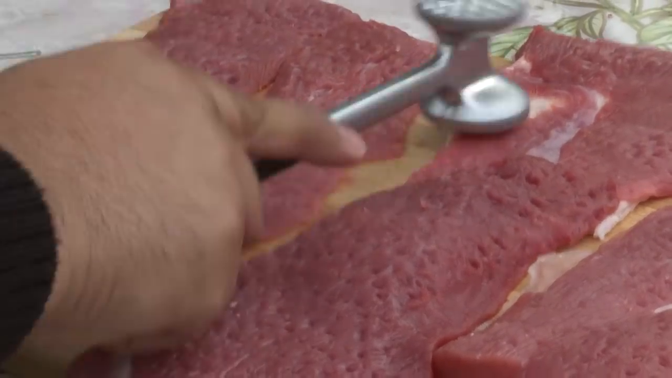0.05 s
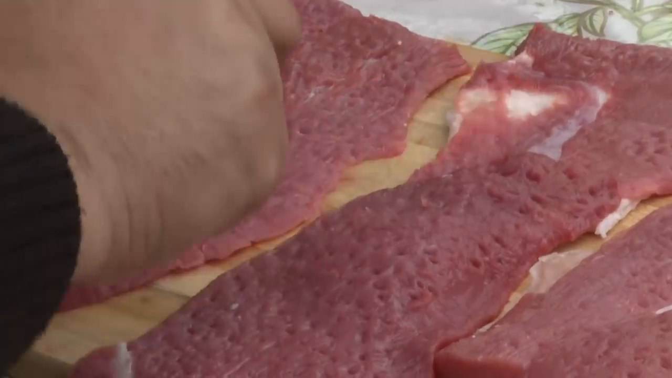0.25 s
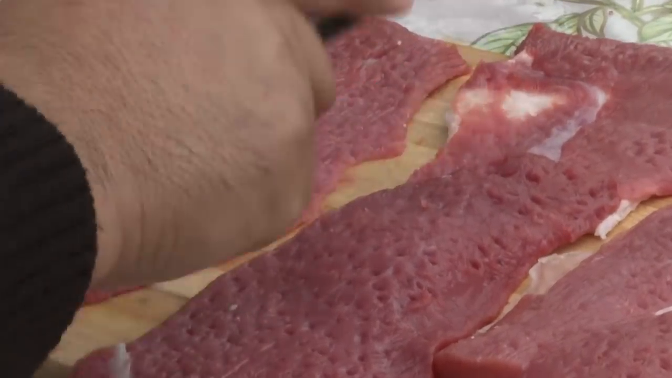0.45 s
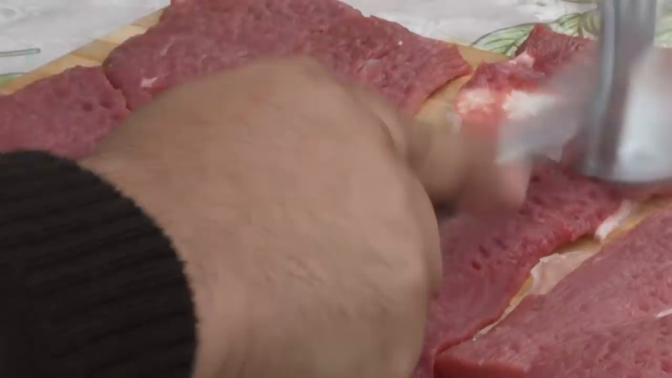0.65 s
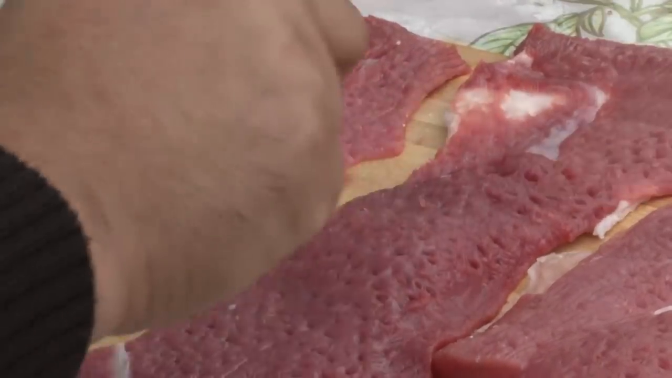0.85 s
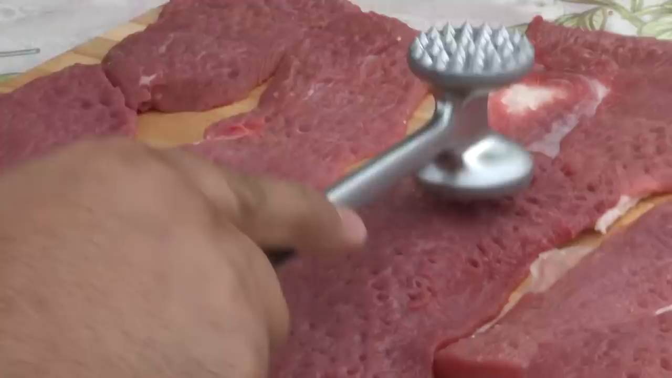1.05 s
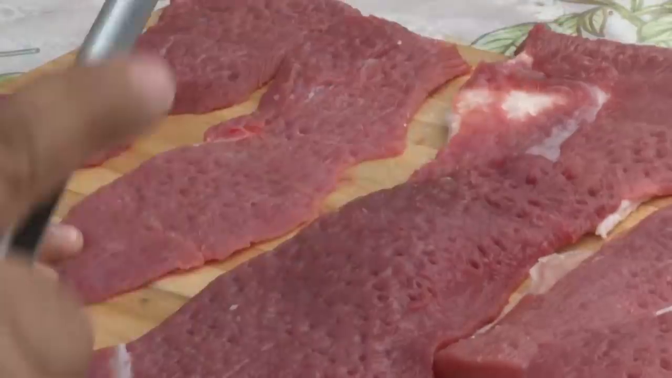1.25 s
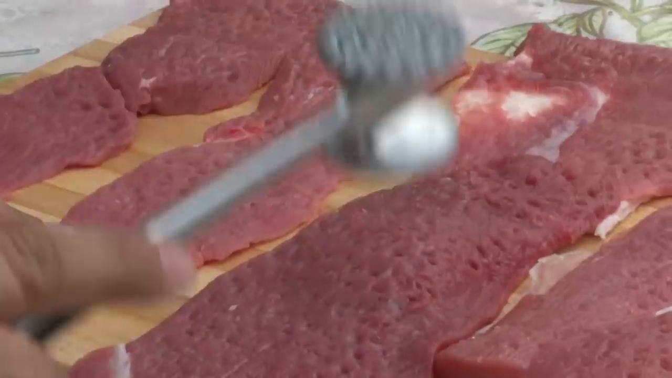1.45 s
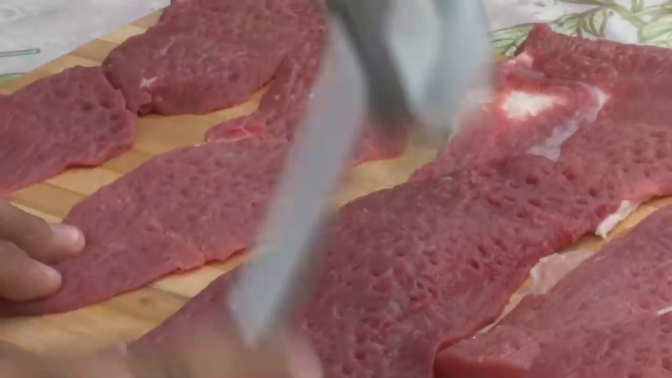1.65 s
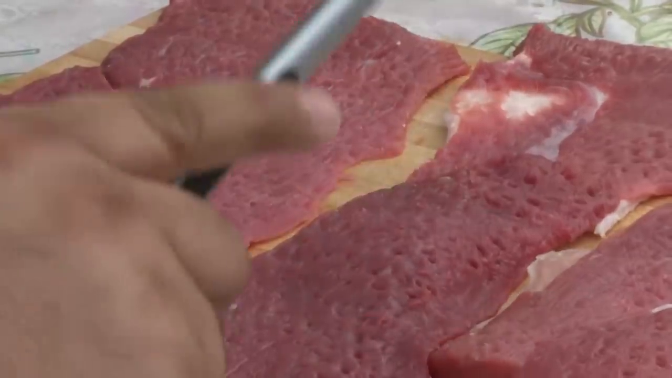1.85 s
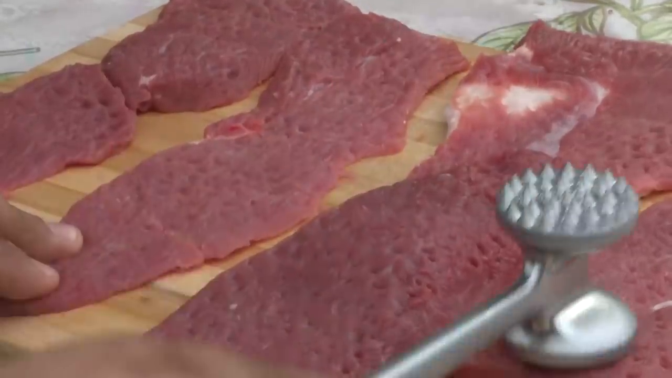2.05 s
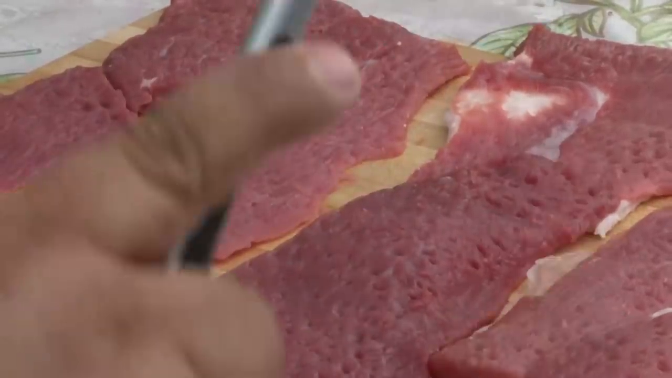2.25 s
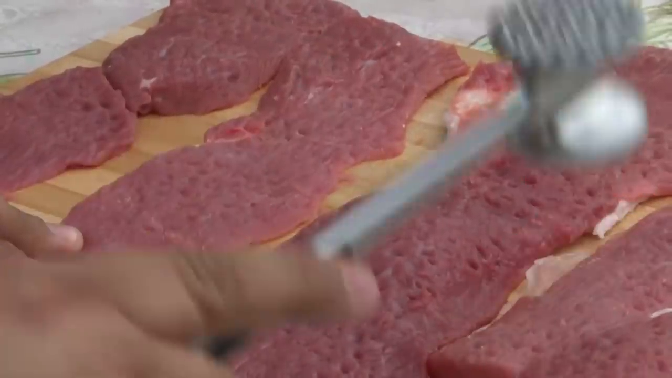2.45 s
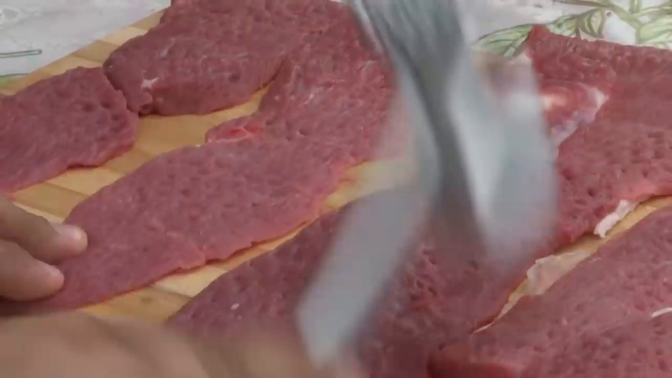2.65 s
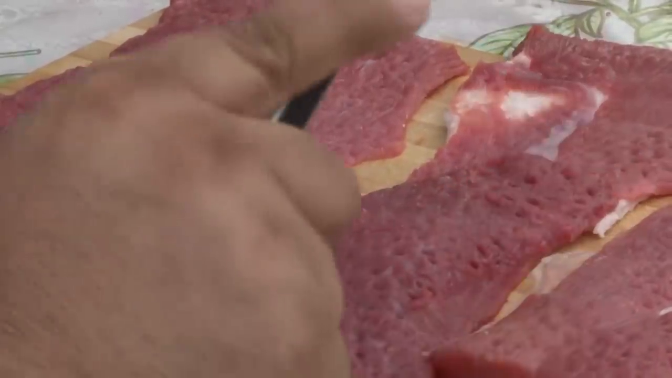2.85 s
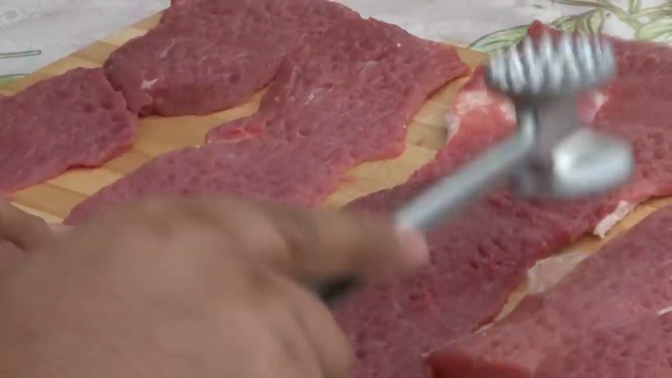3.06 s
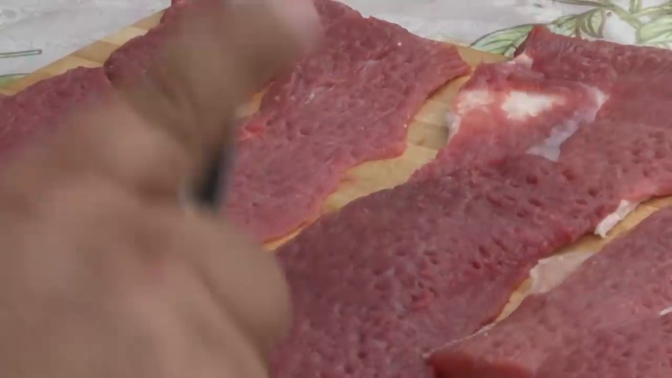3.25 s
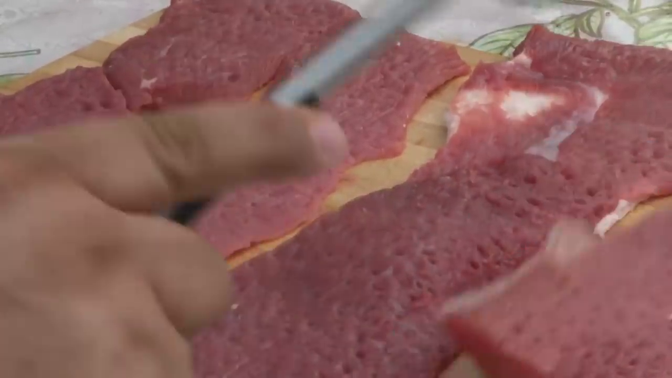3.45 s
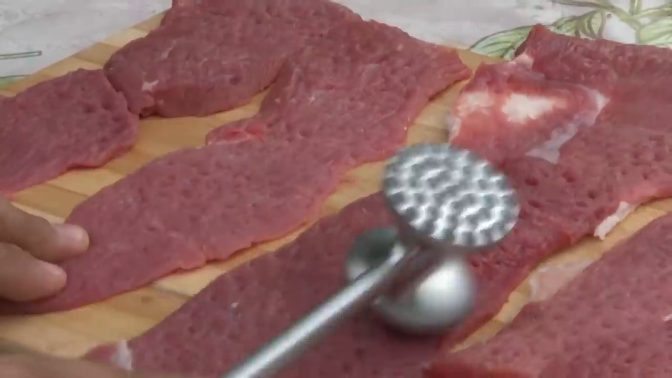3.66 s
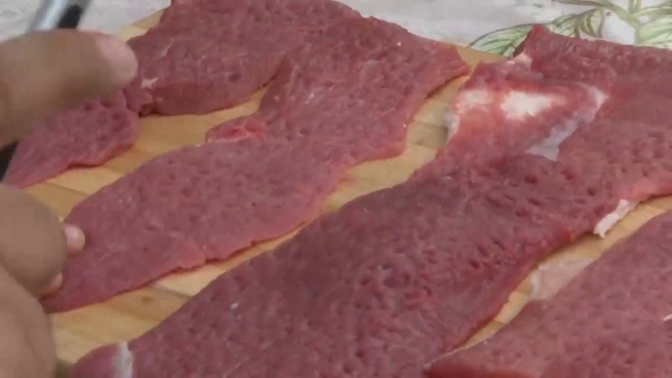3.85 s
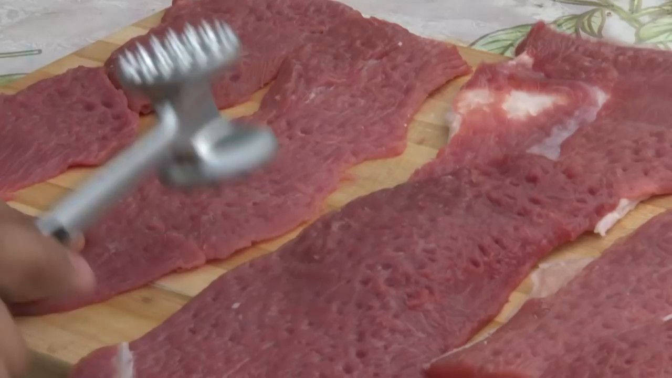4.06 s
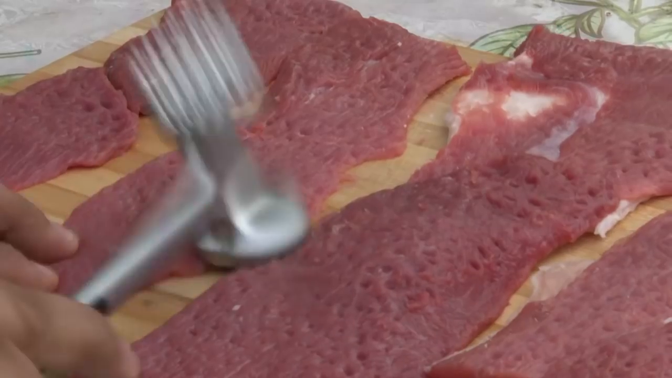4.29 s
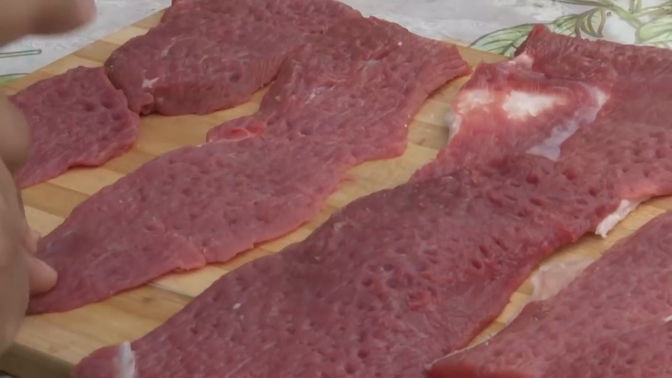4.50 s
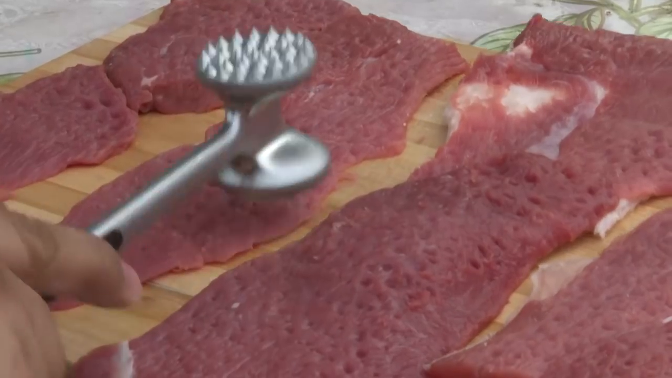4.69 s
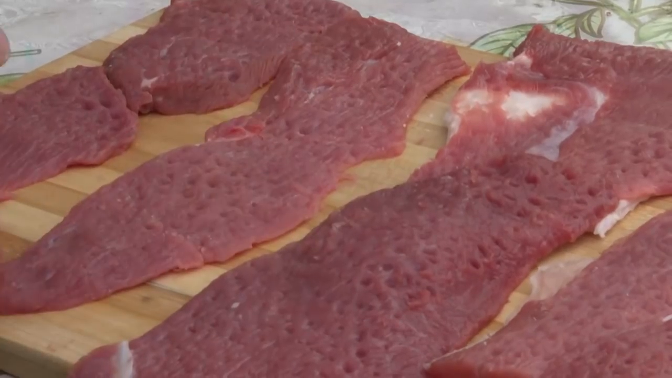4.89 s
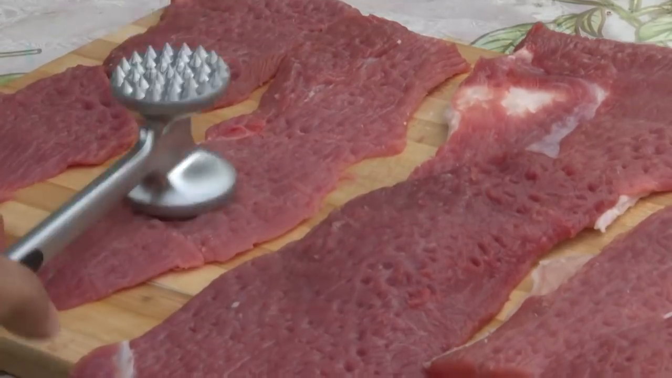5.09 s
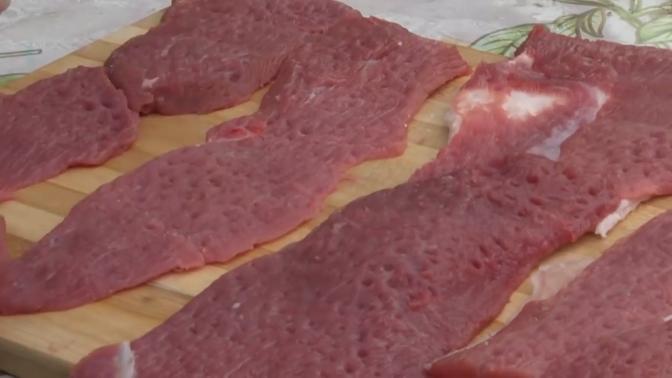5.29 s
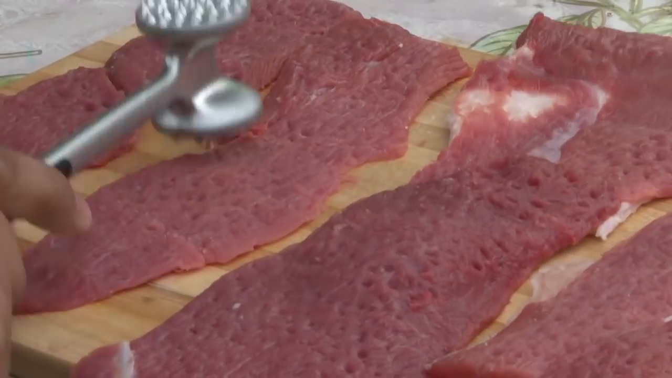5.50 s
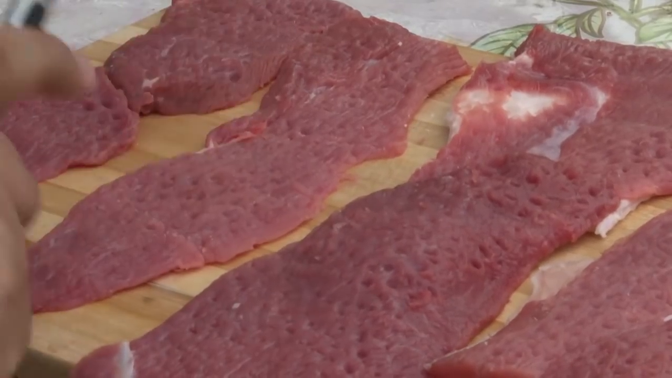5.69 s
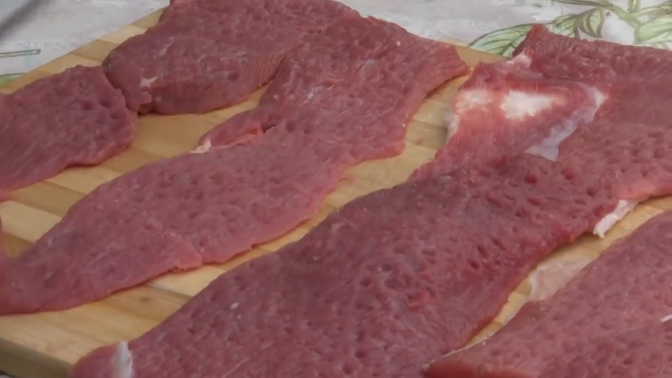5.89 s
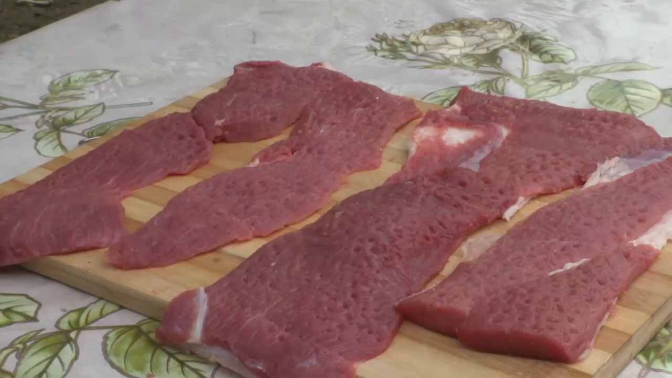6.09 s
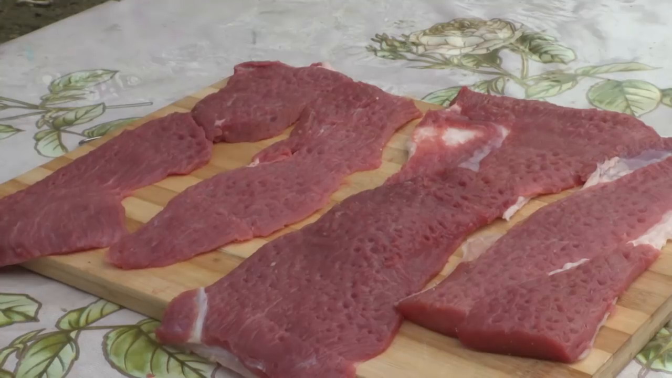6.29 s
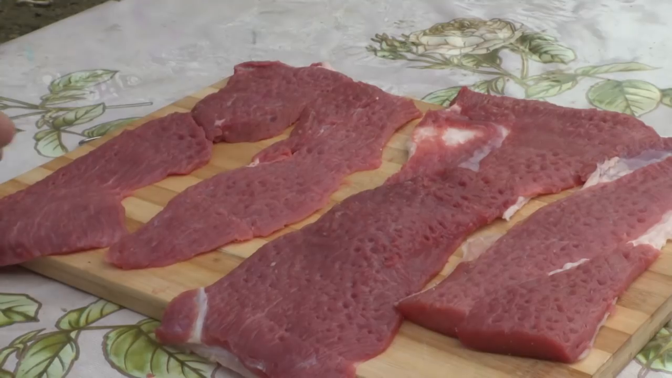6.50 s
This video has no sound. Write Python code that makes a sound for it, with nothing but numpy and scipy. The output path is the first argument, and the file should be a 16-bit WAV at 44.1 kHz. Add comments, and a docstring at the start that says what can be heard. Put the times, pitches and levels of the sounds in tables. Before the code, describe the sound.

Quick, even mallet blows smack moist meat slices on a hollow-sounding wooden board, with board rattle, sticky peeling and a quiet finish.

```python
"""A metal mallet pounds thin slices of meat on a wooden board, three blows a second, close to the microphone.
Each blow is a wet slap of filtered noise and a thump of damped board and table modes;
where the meat is thin the teeth crack on the wood. The board hops and drops back with a noisy knock,
the mallet peels off the meat in grainy crackle, and the hardest blows overload the microphone.
Room echoes, soft scuffs, faint chirps, rumble, air noise and hiss of changing level lie around and beneath."""
import sys
import numpy as np
from scipy import signal
from scipy.fft import rfft, irfft
from scipy.io import wavfile
from scipy.ndimage import uniform_filter1d

SR = 44100
rng = np.random.default_rng(int(sys.argv[2]) if len(sys.argv) > 2 else 0)


def transcribe(signal):
    """Save signal, clipped to [-1, 1], as a 16-bit WAV file at the path in sys.argv[1]."""
    frames = np.atleast_2d(signal).T
    limited = np.clip(frames, -1, 1)
    pcm = np.round(limited * 32767).astype(np.int16)
    wavfile.write(sys.argv[1], SR, pcm)


N = 288405

# The mallet blows. Each row: start in seconds, relative force in dB, meat under the mallet in mm,
# relative slap level in dB, slap centre in Hz, clatter level in dB, time the board stays in the air in seconds.
BLOW_LIST = [(0.123, 5, 0.92, -18.5, 6600, -6.5, 0.043), (0.437, 3.5, 1.52, -18, 6220, -6.5, 0.05),
             (0.742, 1.5, 1.11, -14.5, 9600, -9, 0.049), (1.0918, 5, 2.53, -25, 13100, -11.5, .049),
             (1.4255, 9.5, 4.3, -18, 8240, -17, 0.058), (1.770, 8, 5.5, -27, 9370, -10.5, 0.059),
             (2.0995, 8.5, 2.4, -15.5, 11560, -8, 0.063), (2.4343, 8.5, 1.34, -13.5, 8700, -7.5, 0.068),
             (2.7577, 7.5, 2.13, -12.5, 8000, -8, 0.063), (3.0641, 7.5, 2.3, -19, 7400, -13, .054),
             (3.4016, 8, 2.13, -20.5, 11060, -8.5, 0.061), (3.7236, 6, 5.6, -20, 10200, -20, 0.049),
             (4.0504, 6.5, 6.4, -19, 8800, -18, .046), (4.382, 4.5, 4.9, -32, 6500, -11, 0.037),
             (4.7215, 4, 4.54, -17.5, 8520, -15, 0.047), (5.141, 0.5, 5.9, -18, 7500, -20.5, 0.056),
             (5.506, 4, 5.07, -30.5, 7150, -18.5, 0.045), (5.8331, 3.5, 3.07, -21, 8000, -9, .041)]
# How well the struck spot drives the table, least over the middle of the board.
# Each row: time in seconds, drive in dB.
TABLE_DRIVE = [(0, -30), (.8, -24), (1.8, -43.5), (4, -43), (4.7, -17), (5.85, -17)]
# Colour of sticky or rubbing contact. Each row: frequency in Hz, relative level in dB.
STICKY_SPECTRUM = [(300, -24), (2000, -0.5), (3500, 5.5), (6000, -1), (9000, -6), (11000, -12),
                   (15500, -19.5)]


def amp(db):
    """Turns decibels into a linear gain."""
    return 10 ** (np.asarray(db) / 20)


def unit(x):
    """Scales a sound to energy one."""
    return x / np.sqrt(np.sum(x ** 2) + 1e-20)


def burst_level(x, db):
    """Gives a short sound the energy of two milliseconds at this RMS level."""
    return amp(db) * unit(x) * np.sqrt(.002 * SR)


def read(table, hz, column=1):
    """Reads a table on a log-frequency axis."""
    table = np.array(table, float)
    return np.interp(np.log(hz + 1), np.log(table[:, 0] + 1), table[:, column])


def add(mix, s, sound):
    """Mixes a sound in at s seconds, cut off at the end of the mix."""
    part = mix[max(round(s * SR), 0):][:len(sound)]
    part += sound[:len(part)]


def colour(x, spectrum, size=4096):
    """Causal minimum-phase filter with the given spectrum."""
    log_gain = np.log(amp(read(spectrum, abs(np.fft.fftfreq(size, 1 / SR)))))
    taps = np.fft.ifft(np.exp(np.conj(signal.hilbert(log_gain)))).real
    return signal.fftconvolve(x, taps[:size // 2])[:len(x)]


def ring(modes, t, pitch=1, tilt_db=0, pivot_hz=150):
    """Damped modes set moving together; tilt_db per octave brightens or dulls them around the pivot."""
    out = 0
    for hz, db, t60 in modes:
        level = amp(db + tilt_db * np.log2(hz / pivot_hz))
        decay = np.exp(-np.log(1000) * t / t60)
        out = out + level * decay * np.cos(2 * np.pi * hz * pitch * t)
    return out


def push(rise):
    """Force of a cushioned contact: it grows as the cushion stiffens, then lets go."""
    u = np.arange(0, 2 * rise, 1 / SR) / rise
    return np.minimum(u, 2 - u) ** 2 / (rise * SR)


def slap(t, delay, db, centre_hz, width=0.00091, touch_db=-10,
         peak_db=7, peak_octaves=0.45, squelch_db=-21, squelch_s=.009):
    """A first touch, then air and juice squirt through the gaps between the teeth; a short squelch follows."""
    # Wet slap colour before the peak. Each row: frequency in Hz, relative level in dB.
    slap_spectrum = [(300, -4), (1500, -5.5), (2700, -11.5), (4500, -3.5), (5900, 5.5), (7300, -3.5),
                     (8800, 1.5), (10800, -7.5), (12500, -1.5), (15000, -0.5), (16500, -12)]
    squirt = np.exp(-.5 * ((t - delay) / width) ** 2)
    touch = amp(touch_db) * (t < delay)
    squelch = amp(squelch_db) * np.exp(-t / squelch_s)
    peaked = []
    for hz, level in slap_spectrum:
        octaves = np.log2(hz / centre_hz)
        peaked.append((hz, level + peak_db * np.exp(-(octaves / peak_octaves) ** 2)))
    noise = rng.standard_normal(len(t))
    return burst_level(colour((squirt + touch + squelch) * noise, peaked), db)


def crack(t, db, scatter_s=0.0014, grit=0.22):
    """One tooth meets the wood and the others follow in a tight scatter."""
    # Bright wood crack. Each row: frequency in Hz, relative level in dB.
    crack_spectrum = [(250, -10.5), (450, 4), (570, 17), (780, 1), (980, 6.5), (1400, -2), (1680, 7),
                      (2250, -9.5), (3000, -2), (3800, 5), (5000, -3.5), (5800, -4), (8000, -14.5),
                      (15000, -25.5)]
    teeth = grit * rng.standard_normal(len(t)) * np.exp(-t / scatter_s)
    teeth[0] += 1
    return burst_level(colour(teeth, crack_spectrum), db)


def clatter(t, db, rise_s=0.003, fall_s=0.009):
    """The pressed board chatters against the table."""
    # Hollow wooden chatter. Each row: frequency in Hz, relative level in dB.
    clatter_spectrum = [(120, -11.5), (240, 0), (370, 2), (470, 1.5), (565, 3.5), (700, -5), (950, -6.5),
                        (1350, -18), (1700, -17.5), (2200, -28), (6000, -27.5), (15000, -43)]
    shape = (1 - np.exp(-t / rise_s)) * np.exp(-t / fall_s)
    return burst_level(colour(shape * rng.standard_normal(len(t)), clatter_spectrum), db)


def smacks(slap_db=3.5, slap_delay=0.0011, clatter_delay=.003):
    """Slap, crack and clatter of every blow; thicker meat makes the teeth crack later and more softly."""
    wood_s, wood_s_per_mm = .0032, .0005
    crack_db, crack_db_per_mm = 2, -6
    t, out = np.arange(SR // 8) / SR, np.zeros(N)
    for s, _, meat_mm, wet_db, centre_hz, clatter_db, _ in BLOW_LIST:
        add(out, s, slap(t, slap_delay, wet_db + slap_db, centre_hz))
        wood_time = s + wood_s + wood_s_per_mm * meat_mm
        add(out, wood_time, crack(t, crack_db + crack_db_per_mm * meat_mm))
        add(out, s + clatter_delay, clatter(t, clatter_db))
    return out


def thumps(thump_db=-1.0, seat_s=.0082, seat_db=-10, hop_s=0.055, hop_db=-9, hop_rise=.007,
           detune=0.046, even_db=-35, dulling=.14):
    """Blows ring board and mallet, duller where the table gives way; the board seats, hops and sinks back."""
    # Board and table under the meat. Each row: frequency in Hz, relative level in dB, T60 in seconds.
    board_modes = [(41, -29.5, 0.27), (76, -30.5, 0.36), (107.8, -9, 0.061), (143.7, -5, .06),
                   (209.9, -8, 0.061), (246, -9.5, 0.087), (294.7, -2, .05), (347.4, 0, 0.052),
                   (389, -16, 0.1), (460, -13.5, 0.086), (525, -19.5, 0.022), (686, -12.5, 0.067)]
    # The mallet's faint metal ring. Each row: frequency in Hz, relative level in dB, T60 in seconds.
    metal_modes = [(1750, -55, .3)]
    # Thicker meat cushions the blow, so the force peaks later.
    rise_s, rise_s_per_mm = 0.0019, .00012
    t, out = np.arange(SR // 2) / SR, np.zeros(N)
    sink = signal.fftconvolve(ring(board_modes, t), push(hop_rise))
    for s, force_db, meat_mm, *_ in BLOW_LIST:
        pitch = 1 + detune * rng.uniform(-1, 1)
        drive_db = np.interp(s, *np.transpose(TABLE_DRIVE))
        tilt_db = dulling * (even_db - drive_db)
        force = amp(force_db + thump_db) * push(rise_s + rise_s_per_mm * meat_mm)
        thump = signal.fftconvolve(ring(board_modes, t, pitch, tilt_db), force)
        add(out, s, thump)
        add(out, s + seat_s / pitch, amp(seat_db) * thump)
        add(out, s + hop_s, -amp(force_db + hop_db) * sink)
        add(out, s, amp(force_db) * ring(metal_modes, t))
    return out


def sway(rise=0.0065):
    """Blows on the less supported parts of the table make it boom."""
    # The table top's slow modes. Each row: frequency in Hz, relative level in dB, T60 in seconds.
    table_modes = [(36, -3, 0.42), (54, 1.5, 0.21), (69, 4, 0.091)]
    t, out = np.arange(SR // 2) / SR, np.zeros(N)
    boom = -signal.fftconvolve(ring(table_modes, t), push(rise))
    for s, *_ in BLOW_LIST:
        add(out, s, amp(np.interp(s, *np.transpose(TABLE_DRIVE))) * boom)
    return out


def drops(settle_s=.002):
    """After each hop the board lands again with a dull knock, louder after a longer hop."""
    # Dull landing knock. Each row: frequency in Hz, relative level in dB.
    knock_spectrum = [(100, -3.5), (300, 4.5), (600, -1), (1000, -5), (1500, -16.5), (2500, -29.5),
                      (6000, -37), (15000, -52)]
    usual_hop_s, knock_db, knock_db_per_doubling = 0.055, -23.5, 23.5
    t, out = np.arange(SR // 10) / SR, np.zeros(N)
    for s, *_, hop in BLOW_LIST:
        landing = t * np.exp(-t / settle_s) * rng.standard_normal(len(t))
        db = knock_db + knock_db_per_doubling * np.log2(hop / usual_hop_s)
        # The swell peaks settle_s after its start, so it starts that much early.
        add(out, s + hop - settle_s, burst_level(colour(landing, knock_spectrum), db))
    return out


def peels(lead=0.063, snap_s=.001, creep_s=0.014, creep_db=-13, grain_db=5):
    """Sticky crackle that gathers into a small snap as the meat lets go of mallet or board."""
    # Between blows the wet meat comes unstuck from the board. Each row: time in seconds, level in dB.
    unstick_list = [(3.555, -46.5), (3.568, -49), (4.891, -58.5), (5.745, -48.5)]
    # The mallet lifts off at nearly the same moment after every blow; smaller snaps fall around it.
    lift_s, lift_spread_s, lift_db = .081, 0.0034, -45.5
    small_s, small_spread_s, small_db = .068, 0.014, -49
    t, out = np.arange(SR // 10) / SR - lead, np.zeros(N)
    shape = np.exp(-abs(t) / snap_s) + amp(creep_db) * np.exp(-abs(t) / creep_s)
    releases = list(unstick_list)
    for s, *_ in BLOW_LIST:
        lift, small = rng.standard_normal(2)
        releases.append((s + lift_s + lift_spread_s * lift, lift_db))
        releases.append((s + small_s + small_spread_s * small, small_db))
    for s, db in releases:
        noise, grain = rng.standard_normal((2, len(t)))
        crackle = noise * amp(grain_db * grain) * shape
        add(out, s - lead, burst_level(colour(crackle, STICKY_SPECTRUM), db))
    return out


def scuffs(grain_db=5):
    """Soft scuffs of hand and sleeve: short swells of grainy friction."""
    # Each row: centre in seconds, half length in seconds, level in dB.
    scuff_list = [(5.773, 0.025, -64), (6.268, 0.029, -65.5), (6.419, .04, -66.5)]
    clock = np.arange(N) / SR
    noise, grain = rng.standard_normal((2, N))
    swell = sum(amp(db) * np.exp(-((clock - s) / half) ** 2) for s, half, db in scuff_list)
    friction = colour(noise * amp(grain_db * grain), STICKY_SPECTRUM)
    return swell * unit(friction) * np.sqrt(N)


def tail(table, delay):
    """Diffuse echoes that die band by band: random signs shaped in short-time spectra."""
    hz, t, z = signal.stft(rng.choice([-1., 1.], SR), SR, nperseg=1024)
    rate = np.log(1000) / read(table, hz, column=2)[:, None]
    # The root keeps each band's energy independent of its decay time.
    z *= amp(read(table, hz))[:, None] * np.exp(-rate * t) * np.sqrt(2 * rate / SR)
    out = np.zeros(SR)
    add(out, delay, signal.istft(z, SR, nperseg=1024)[1])
    return out


def reflections(common, count=5):
    """Overlapping echo patterns, each with its own splash of the smacks, slowly trade places."""
    # Near reflections. Each row: frequency in Hz, relative level in dB, T60 in seconds.
    near_bands = [(30, -13, .3), (111.1, -21, .3), (247, -14, 0.089), (550, -13.5, .14), (1210, -11, 0.1),
                  (2550, -16, 0.047), (6000, -20, 0.12), (15060, -20, 0.081)]
    # Far reverberation. Each row: frequency in Hz, relative level in dB, T60 in seconds.
    far_bands = [(30, -27, 0.76), (111, -22, 0.42), (260, -17, 0.54), (340.3, -26.5, 0.57),
                 (496, -23, 0.47), (1090, -18.5, .6), (1600, -10.5, 0.74), (1740, -13, 0.34),
                 (2000, -20, 0.36), (2600, -24.5, 0.47), (3932, -29, 0.59), (7860, -27, .3),
                 (15000, -31, .2)]
    out, clock = np.zeros(N), np.arange(N) / SR
    for k in range(count):
        share = np.sqrt(2 / count) * np.cos(np.pi * (clock + k / count))
        echoes = tail(near_bands, delay=.005) + tail(far_bands, delay=0.022)
        add(out, 0, signal.oaconvolve((common + smacks()) * share, echoes))
    return out


def chirp(waver=0.04):
    """Faint, far chirps and whistles: thin tones that swell, glide and fade, their pitch wavering."""
    # Each row: start in seconds, length in seconds, first pitch in Hz, last pitch in Hz, level in dB.
    chirp_list = [(0, .14, 1400, 1370, -55.5), (2.343, .025, 5820, 2700, -60),
                  (2.365, .035, 2550, 3000, -60), (2.398, 0.032, 3000, 2660, -59.5),
                  (5.42, .07, 1533, 1570, -63), (6.366, .07, 4300, 3600, -65)]
    out = np.zeros(N)
    for s, length, first_hz, last_hz, db in chirp_list:
        u = np.arange(0, length, 1 / SR) / length
        jitter = uniform_filter1d(rng.standard_normal(len(u)), size=30)
        glide = first_hz * (last_hz / first_hz) ** u
        pitch = glide * (1 + waver * jitter / jitter.std())
        swell = np.sqrt(abs(np.sin(np.pi * u)))
        add(out, s, amp(db) * swell * np.sin(2 * np.pi * np.cumsum(pitch) / SR))
    return out


def background(spectrum, levels):
    """Spectrally shaped noise that follows a level curve."""
    gain = amp(read(spectrum, np.fft.rfftfreq(N, 1 / SR)))
    noise = irfft(rfft(rng.standard_normal(N)) * gain, N)
    level_db = np.interp(np.arange(N) / SR, *np.transpose(levels))
    return unit(noise) * np.sqrt(N) * amp(level_db)


def rumble():
    """Deep rumble: noise weighted to the lowest bass."""
    # Each row: frequency in Hz, relative density in dB per Hz.
    rumble_spectrum = [(15, -8), (30, 0.5), (55, 1), (90, -7), (150, -14), (300, -33), (1000, -71.5)]
    # Each row: time in seconds, level in dB.
    rumble_levels = [(0, -56.5), (4, -67), (4.85, -49), (6.03, -52), (6.1, -58.5)]
    return background(rumble_spectrum, rumble_levels)


def air():
    """Air noise that rises and falls, strongest in the bass near 120 Hz."""
    # Each row: frequency in Hz, relative density in dB per Hz.
    air_spectrum = [(20, -13), (55, -7), (120, -1.5), (180, -6.5), (255, -7), (330, -12), (700, -16),
                    (1100, -17.5), (1400, -16), (1800, -18.5), (2150, -33.5), (4000, -44.5)]
    # Each row: time in seconds, level in dB.
    air_levels = [(0, -52), (1, -58.5), (3.1, -57), (4, -62.5), (5.5, -59), (5.85, -53), (6.15, -58.5)]
    return background(air_spectrum, air_levels)


def hiss():
    """Faint high hiss: noise weighted to the treble."""
    # Each row: frequency in Hz, relative density in dB per Hz.
    hiss_spectrum = [(500, -24), (2200, -2.5), (4000, 0.5), (6000, 0.5), (9000, -0.5), (11500, -4.5),
                     (15500, -8)]
    # Each row: time in seconds, level in dB.
    hiss_levels = [(0, -71.5), (5.5, -72), (6.05, -66)]
    return background(hiss_spectrum, hiss_levels)


def scene():
    """Direct blows and handling, their reflections, and the background bed, as one channel."""
    common = thumps() + sway() + drops() + peels() + scuffs()
    bed = rumble() + air() + hiss() + chirp()
    return (common + smacks() + reflections(common) + bed)[None]


def record(dry):
    """The microphone loses the deepest bass and clips at full scale; then the band limit."""
    edge_hz = 16200
    thinned = signal.sosfilt(signal.butter(1, 15, "high", fs=SR, output="sos"), dry)
    clipped = np.clip(thinned, -1, 1)
    lowpass = signal.firwin(255, edge_hz, window=("kaiser", 8), fs=SR)
    return signal.oaconvolve(clipped, lowpass[None], "same")


dry = scene()
out = record(dry)
transcribe(out)
```